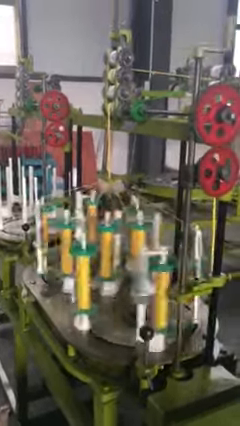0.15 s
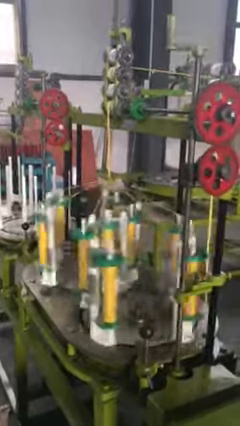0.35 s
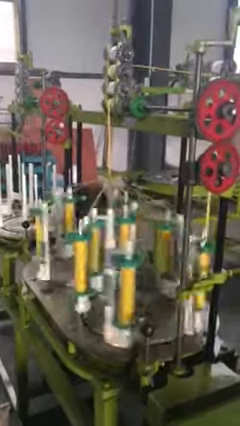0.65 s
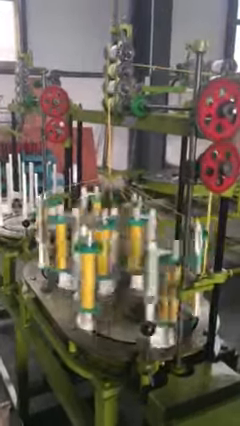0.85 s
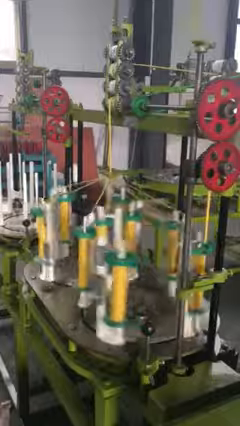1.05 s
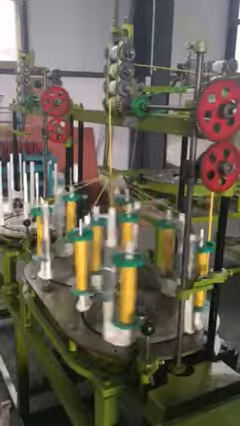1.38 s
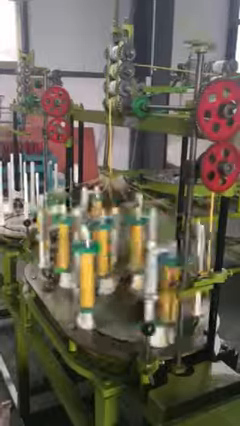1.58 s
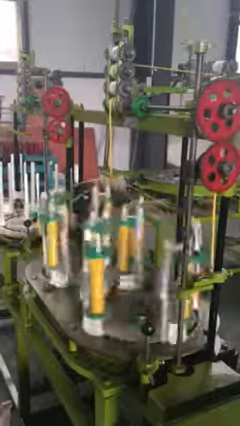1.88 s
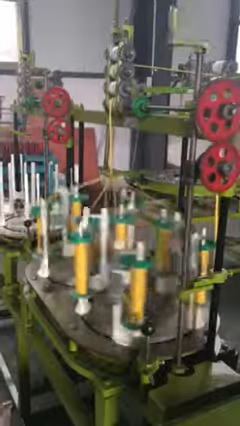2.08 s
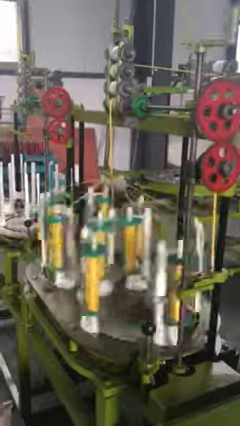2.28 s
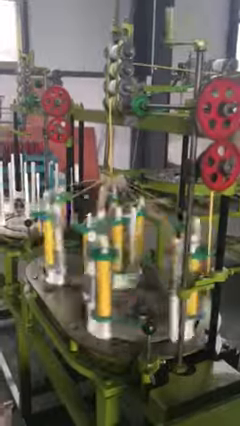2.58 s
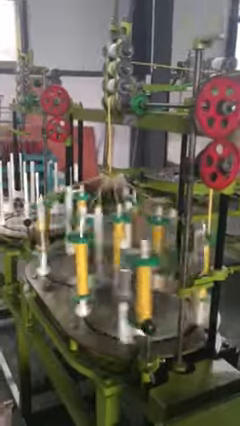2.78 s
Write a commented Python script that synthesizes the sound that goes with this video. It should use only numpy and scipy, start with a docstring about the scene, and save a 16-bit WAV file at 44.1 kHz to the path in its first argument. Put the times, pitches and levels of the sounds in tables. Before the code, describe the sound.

A braiding machine runs with irregular metallic clinks and clatter over a steady mechanical roar.

```python
"""A braiding machine runs close by in a workshop, its bobbin carriers weaving round a cast plate.
Steel tension weights and latches clink: each blow cracks, then rings until the next contact damps it.
Lighter touches keep the same parts jingling, and carrier feet chatter in their tracks in waves.
Gears, motor and neighbouring machines roar underneath; a short room tail follows the metal."""
import sys
import numpy as np
from scipy import signal
from scipy.io import wavfile
from scipy.ndimage import uniform_filter1d

SR = 44100
rng = np.random.default_rng(int(sys.argv[2]) if len(sys.argv) > 2 else 0)


def wrap_up_sound(samples):
    """Save the sound to the file named by the first command line argument, as 16-bit audio."""
    columns = np.atleast_2d(samples).T
    # keep every value between -1 and 1, then stretch to whole-number steps
    tamed = np.clip(columns, -1, 1)
    steps = np.round(tamed * 32767).astype(np.int16)
    wavfile.write(sys.argv[1], SR, steps)


N = 129654

# Ringing modes of a carrier's steel parts: pitch_hz, level_db, t60_s
STEM_MODES = [(3350, -8, .07), (3445, -2, .1), (3495, 0, .13), (3560, -4, .08), (3750, -7, .12)]
GUIDE_MODES = [(4098, -0.5, 0.14), (4590, -7.5, 0.067), (4860, -14, 0.21)]
WEIGHT_MODES = [(5310, -5, .16), (5430, 0, .2), (5560, -8, .12), (6250, -2, .12)]
LATCH_MODES = [(6760, -3, .13), (6990, -2, .12), (7050, 0, .12), (7110, -3, .12), (7340, -5, .15),
               (7505, -3, .15), (7625, -8, .12)]
PAWL_MODES = [(8290, -5, .15), (8390, 0, .16), (8760, -9, .15), (9080, -5, .16), (9300, -13, .12)]
PIN_MODES = [(10860, -3, .14), (11100, 0, .15), (11260, -7, .14), (11800, -6, .14), (11930, -1, .18),
             (13010, -9, .14)]
SPRING_MODES = [(14280, -12, .15), (14670, -6, .15), (14870, 0, .15), (15100, -10, .1)]
STEEL_PARTS = [STEM_MODES, GUIDE_MODES, WEIGHT_MODES, LATCH_MODES, PAWL_MODES, PIN_MODES, SPRING_MODES]
# Waves of activity on the track: time_s, chatter_db, jingle_db
TRACK_ACTIVITY = [(0, -30.5, -30), (.05, -33.5, -34), (.085, -23, -30), (.12, -48, -33.5), (.2, -33, -31),
                  (.32, -29, -25.5), (.42, -38, -28.5), (.46, -29, -32), (.6, -31.5, -29.5),
                  (.77, -35.5, -35.5), (.9, -29, -32.5), (1.0, -33, -28), (1.12, -35, -36.5),
                  (1.19, -29, -30), (1.26, -35, -33.5), (1.42, -35.5, -37.5), (1.5, -31.5, -30),
                  (1.54, -26, -29), (1.6, -33, -31.5), (1.74, -38, -29), (1.82, -28.5, -29),
                  (1.95, -31.5, -26.5), (2.06, -36, -34.5), (2.18, -30, -30.5), (2.3, -32.5, -26.5),
                  (2.42, -39, -32.5), (2.46, -26, -32), (2.62, -32, -28), (2.75, -40, -40),
                  (2.83, -25.5, -23.5), (2.94, -30.5, -34)]


def undb(db):
    return 10 ** (np.asarray(db) / 20)


def level(x, db):
    """Set the RMS level."""
    return x * undb(db) / np.sqrt(np.mean(x ** 2))


def track_gain(column):
    """One level column of the track activity as a smooth fader ride."""
    points = np.array(TRACK_ACTIVITY)
    return undb(np.interp(np.arange(N) / SR, points[:, 0], points[:, column]))


def band(x, hz, width_hz, passes=1):
    """Unity-gain resonance; more passes steepen its skirts."""
    b, a = signal.iirpeak(min(hz, .45 * SR), max(hz / width_hz, .3), fs=SR)
    for _ in range(passes):
        x = signal.lfilter(b, a, x)
    return x


def wander(rate_hz):
    """Random steps smoothed into a drift."""
    hold = int(SR / rate_hz)
    steps = np.repeat(rng.standard_normal(N // hold + 1), hold)
    return 1.35 * uniform_filter1d(uniform_filter1d(steps, hold), hold)[:N]


def ticks(per_s, spread_db):
    """Random clicks, many small and a few large."""
    chance, size, polarity = rng.random((3, N))
    size_db = spread_db * np.minimum(-np.log(1 - size), 3)
    return (chance < per_s / SR) * undb(size_db) * np.sign(polarity - .5)


def grit(hits):
    """A 3 ms puff of noise on every hit."""
    return rng.standard_normal(N) * uniform_filter1d(np.abs(hits), size=130)


def steel_jingle():
    """Countless light touches tick and briefly ring the steel, each with its own mix of modes."""
    # Mix of stem, guide, weight, latch, pawl, pins, spring: level_db
    part_levels = [-5.5, -19.5, -15, -17.5, -19.5, -27, -28]
    t60_scale, scatter_db = .4, 7.5
    touches = ticks(per_s=230, spread_db=1.5)
    out = 0
    for modes, part_db in zip(STEEL_PARTS, part_levels):
        ring = 0
        for hz, db, t60 in modes:
            pole = np.exp(2j * np.pi * hz / SR - np.log(1000) / (t60 * t60_scale * SR))
            strikes = touches * undb(scatter_db * rng.standard_normal(N))
            ring += undb(db) * signal.lfilter([1], [1, -pole], strikes).imag
        out += level(ring, part_db)
    dry_ticks = band(grit(touches), hz=5450, width_hz=5500, passes=2)
    return (out + level(dry_ticks, -13)) * track_gain(2)


def feet_chatter():
    """Carrier feet knock along the tracks and ring the broad resonances of the plate."""
    # Broad plate resonances: pitch_hz, width_hz, level_db
    resonances = [(680, 110, -3), (970, 190, 0), (1980, 300, -1)]
    feet = band(ticks(per_s=1100, spread_db=3.3), hz=1490, width_hz=4000)
    body = sum((-1) ** k * undb(db) * band(feet, hz, width) for k, (hz, width, db) in enumerate(resonances))
    rasp = band(grit(feet), hz=1780, width_hz=2930)
    rasp = band(rasp, hz=1960, width_hz=3400)
    return level(level(body, 0) + level(rasp, 1.5), -1) * track_gain(1)


def machine_roar():
    """Motor and neighbouring machines roar, with a wavering gear drone, thin hiss and steady whine."""
    # Tone curve of the roar: pitch_hz, level_db
    spectrum = [(18, -39), (30, -8.5), (64, 2), (190, -1.5), (249, -5.5), (509, -3), (834, -6.5),
                (967, -3.5), (1400, -4.5), (1970, -0.5), (2860, -23), (3480, 1), (4790, -17.5),
                (7110, -15.5), (10800, -26.5), (14000, -53), (22000, -120)]
    curve_hz, curve_db = np.array(spectrum).T
    swell_db = .4 * wander(rate_hz=2.9)
    roar = 0
    for hz in 25 * 2 ** (np.arange(27) / 3):  # third octaves swell together and flicker alone
        flicker_db = 1.3 * wander(rate_hz=9.26)
        db = np.interp(np.log(hz), np.log(curve_hz), curve_db) + swell_db + flicker_db
        roar += undb(db) * band(rng.standard_normal(N), hz, hz / 3.18, passes=2)
    gears = band(rng.standard_normal(N), hz=258.3, width_hz=54, passes=2)
    gears *= undb(2.5 * wander(rate_hz=4.5))
    whine = band(rng.standard_normal(N), hz=10000, width_hz=6.5)
    hiss = band(rng.standard_normal(N), hz=15200, width_hz=5000)
    return level(roar, -32.5) + level(gears, -44.5) + level(hiss, -47.5) + level(whine, -64)


def carrier_clinks():
    """Each blow cracks and sets all parts ringing and rattling until the next contact damps them."""
    # Blows, with relative levels: start_s, crack_db, plate_db, stem_db, guide_db, weight_db, latch_db,
    # pawl_db, pins_db, spring_db, then any number of lead_hz (pitches that stand out)
    blows = [(0.071, -25, -19, -40, -45, -46, -46, -48, -52, -52, 930),
             (0.0841, -3, -39, -23, -38, -46, -42, -35, -50, -47),
             (0.2073, -29.5, -23, -35, -35, -42, -41, -48, -53, -52),
             (0.2782, -20, -32, -10.5, -30, -25, -22, -33, -33, -41, 3490, 5360, 6760, 7100, 10870),
             (0.3394, -12, -15, -38, -29.5, -35, -35, -40, -44, -47),
             (0.4523, -13, -26.5, -28, -30, -38, -49, -44, -47, -50),
             (0.5201, 2, -18.5, -21.5, -24.5, -30, -24, -23, -27.5, -29, 4110, 6870, 8350, 11100, 14830),
             (0.5444, -11, -38, -24, -30, -31, -26, -34, -35, -40, 3770, 6250),
             (0.578, -16, -33, -39, -32, -25, -40, -47, -50, -49, 5370, 6120),
             (0.6355, -22, -43, -23.5, -36, -34, -36.5, -40, -52, -47),
             (0.8919, -14, -16.5, -24.5, -45, -47, -46, -50, -55, -49),
             (0.9267, -14, -27, -22, -41, -34, -25, -35, -49, -35, 7090),
             (0.9378, -19, -31, -19.5, -37, -27, -40, -33, -41, -40, 5550),
             (0.9744, -14, -19.5, -19, -43, -50, -30, -41, -44, -46, 3500),
             (1.1701, 1.5, -28, -23, -29, -40, -17, -23, -33, -19, 3740, 6990, 7340, 8285, 14870),
             (1.1844, -16, -23.5, -20, -30, -28, -34, -25, -36, -17),
             (1.24, -17, -39, -29, -34, -27, -36, -23.5, -39, -37, 5440, 8400, 9080, 11940),
             (1.2544, -15, -34, -32, -28, -40, -29, -33, -39, -44, 4120, 7520),
             (1.3777, -12, -22, -25.5, -42, -26.5, -35, -37, -41, -47, 5370, 6280),
             (1.4505, -16, -21.5, -28, -37, -41, -38, -31.5, -43, -49, 675, 7290, 8990),
             (1.5717, -13, -34, -16, -36, -49, -26.5, -37, -40, -42, 7060),
             (1.7598, -22, -36, -31, -34, -28, -36, -42, -54, -46, 5380),
             (1.8336, 2, -19.5, -20.5, -34, -16.5, -16, -18, -27, -26, 3760, 5430, 7030, 7500, 8400, 9080, 11930),
             (1.8564, 9, -18, -15.5, -25, -21, -31, -36, -44, -35),
             (1.8764, -14, -36, -24, -30, -33, -21.5, -24, -36, -34, 8400),
             (1.8924, 6, -17, -16, -26, -39, -39, -46, -36, -40, 4820),
             (1.9114, -13, -37, -31, -35, -28, -30, -42, -40, -45),
             (2.098, -17, -38, -23, -36, -34, -45, -40, -47, -38),
             (2.116, -17, -23, -30, -28, -29, -32, -31.5, -49, -41, 4150, 5360, 6300),
             (2.2232, 2, -32, -18.5, -29, -25, -29, -43, -46, -39, 3480, 4890, 6240, 7260),
             (2.3939, -23, -28, -43, -28, -28, -34, -47, -48, -47),
             (2.4552, 1, -15.5, -16, -37, -31, -23, -43, -52, -45, 6970),
             (2.4734, -4, -42, -23, -39, -30, -41, -37, -47, -41),
             (2.4946, 7, -21, -23, -40, -27, -21, -19, -30, -26, 3470, 5290, 7085, 8380, 8760, 10840, 14650),
             (2.5214, -13, -41, -19, -39, -34, -25, -41, -44, -38),
             (2.5364, -13, -17, -26, -38, -27, -25, -46, -34, -43, 6750),
             (2.5925, 1.5, -29, -24, -25, -31, -37, -38, -37, -47),
             (2.8169, -21, -38, -28, -35, -32, -33, -52, -55, -48),
             (2.8573, -16, -31, -28, -38, -30, -28, -31, -40, -37),
             (2.8912, -18, -40, -23.5, -38, -28.5, -34, -47, -40, -44, 3470, 5400)]
    # Modes of the cast plate: pitch_hz, level_db, t60_s
    plate_modes = [(680, -8, .08), (960, -6, 0.08), (1713, 0.5, 0.029), (1962, -1.5, 0.062),
                   (2332, 1, 0.032)]
    scatter_db, detune = 4.5, .005  # every blow lands elsewhere, on a slightly different carrier
    ring_s, damp_s = .026, .0067  # typical free ring, then the damping time constant
    lead_db, lead_ring_s = 12, .036  # a lead mode is louder and rings longer
    rattle_db, rattle_hz = 1.8, 151  # loose parts shake while ringing
    bounce_s = .0026  # a blow is a few contacts in a row, which softens the attack
    parts = [plate_modes] + STEEL_PARTS
    pitches = np.concatenate(parts)[:, 0]
    out, t = np.zeros(N + SR), np.arange(SR // 8) / SR
    for start_s, crack_db, *voicing in blows:
        part_levels, leads = voicing[:len(parts)], voicing[len(parts):]
        variation = rng.standard_normal((len(pitches), 4))
        shake_points = rng.standard_normal((len(pitches), 64))
        shake = np.array([np.interp(t * rattle_hz, np.arange(64), row) for row in shake_points])
        lead_hz = np.zeros((len(pitches), 1))
        for hz in leads:  # each lead takes over the nearest mode
            lead_hz[np.argmin(np.abs(pitches - hz))] = hz
        ring, first = 0, 0
        for modes, part_db in zip(parts, part_levels):
            rows = slice(first, first + len(modes))
            first += len(modes)
            hz, db, t60 = np.array(modes).T[:, :, None]
            loudness, tuning, length, bounce = variation[rows].T[:, :, None]
            is_lead = lead_hz[rows] > 0
            gain = undb(db + np.where(is_lead, lead_db, scatter_db * loudness))
            gain *= np.sqrt(2 / np.sum(gain ** 2))
            free_s = np.where(is_lead, lead_ring_s, ring_s * np.exp(.71 * length))
            attack = np.clip(t / (bounce_s * np.abs(bounce)), 0, 1)
            decay = np.exp(-np.log(1000) * t / t60 - np.maximum(t - free_s, 0) / damp_s)
            rattle = undb(rattle_db * shake[rows])
            pitch_hz = np.where(is_lead, lead_hz[rows], hz * (1 + detune * tuning))
            tones = np.sin(2 * np.pi * pitch_hz * t)
            ring += undb(part_db - 2.5) * np.sum(gain * attack * decay * rattle * tones, axis=0)
        burst = rng.standard_normal(len(t)) * np.exp(-t / .002)
        crack = undb(crack_db - 18) * band(burst, hz=3600, width_hz=7500, passes=3)
        start = int(start_s * SR)
        out[start:start + len(t)] += ring + crack
    return out[:N]


def workshop_reverb(x, t60_s=.27, predelay_s=.006, level_db=-9.5):
    """The walls return a short, diffuse tail."""
    t = np.arange(SR // 2) / SR
    tail = band(rng.standard_normal(len(t)), hz=2560, width_hz=7000)
    tail *= np.exp(-np.log(1000) * t / t60_s) * (t > predelay_s)
    tail *= undb(level_db) / np.sqrt(np.sum(tail ** 2))
    return signal.fftconvolve(x, tail)[:N]


def scene():
    """Close metal and its reverb over the machine bed, in mono."""
    metal = carrier_clinks() + steel_jingle() + feet_chatter()
    return (metal + workshop_reverb(metal) + machine_roar())[None]


def record(dry):
    """A steep high cut at 15.75 kHz."""
    return signal.sosfilt(signal.ellip(12, .2, 80, 15750, fs=SR, output="sos"), dry)


dry = scene()
out = record(dry)
wrap_up_sound(out)
```